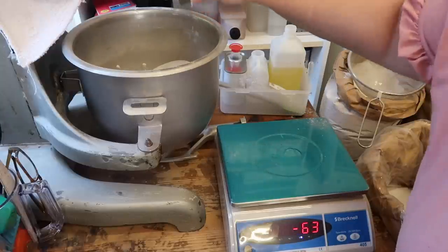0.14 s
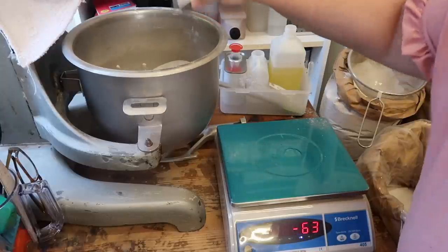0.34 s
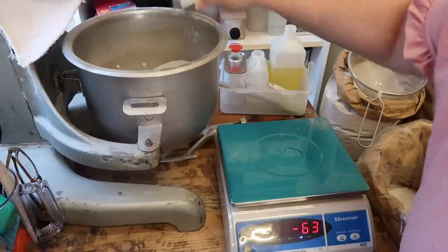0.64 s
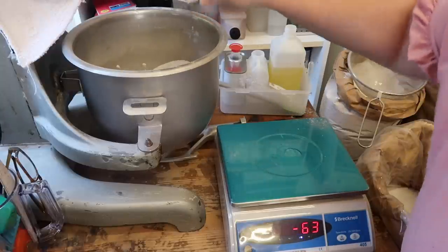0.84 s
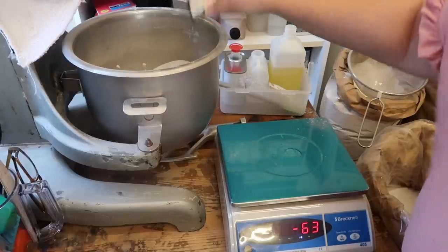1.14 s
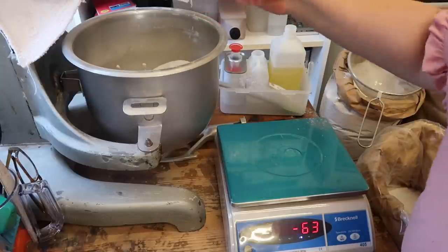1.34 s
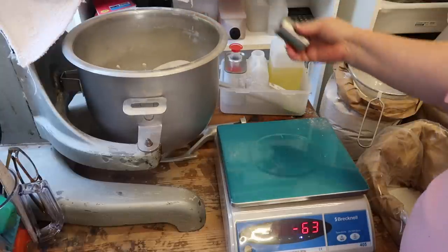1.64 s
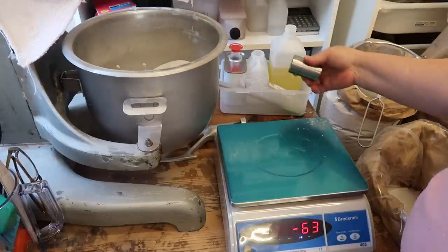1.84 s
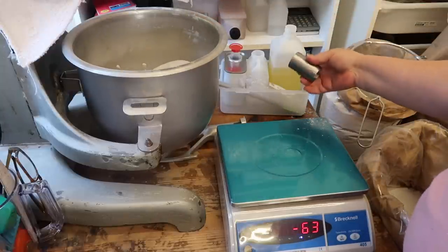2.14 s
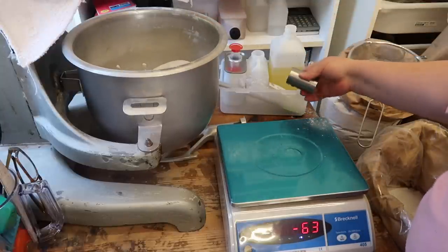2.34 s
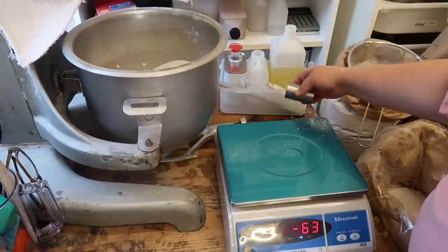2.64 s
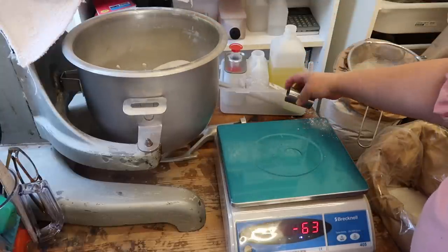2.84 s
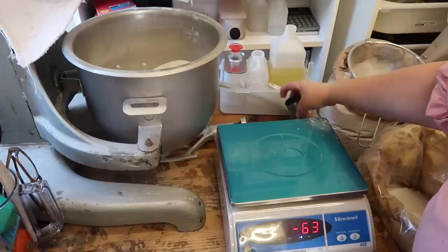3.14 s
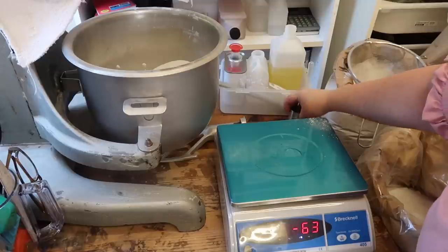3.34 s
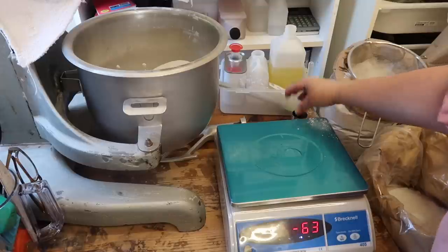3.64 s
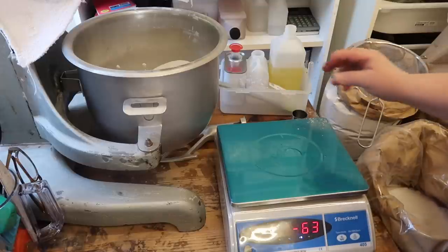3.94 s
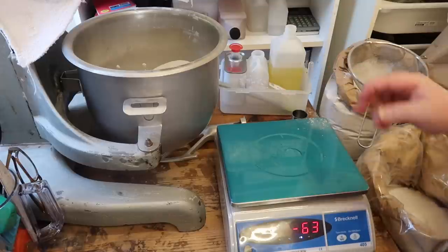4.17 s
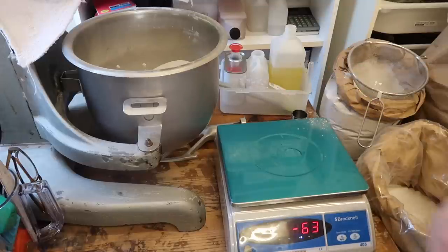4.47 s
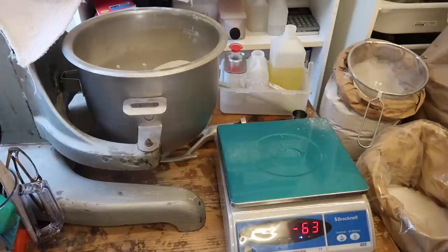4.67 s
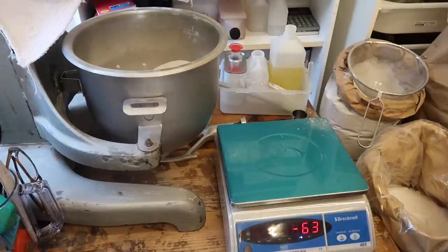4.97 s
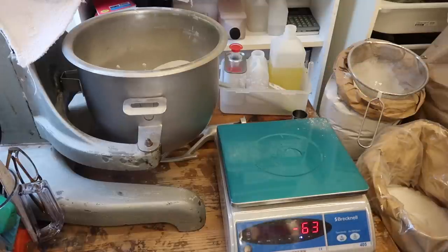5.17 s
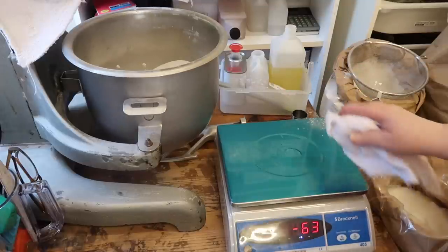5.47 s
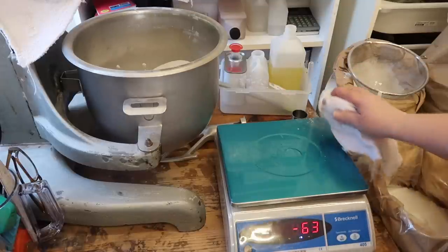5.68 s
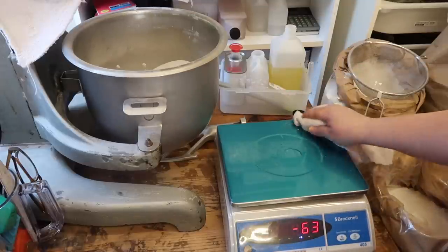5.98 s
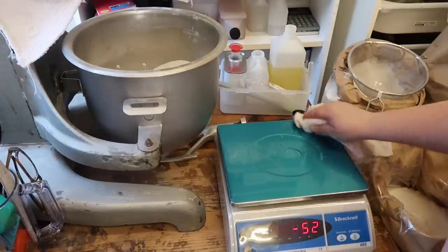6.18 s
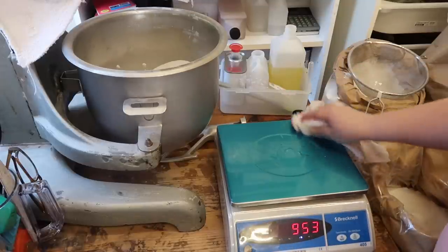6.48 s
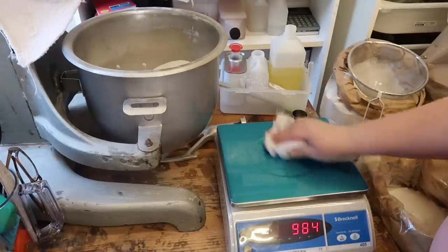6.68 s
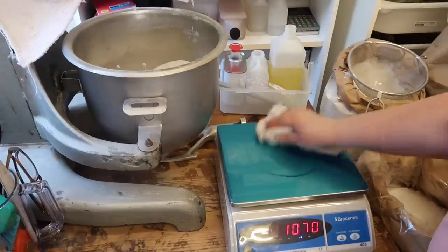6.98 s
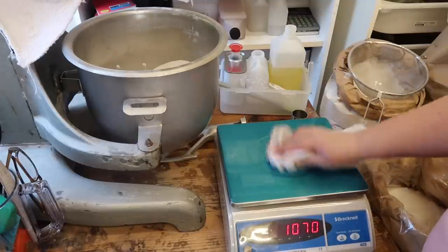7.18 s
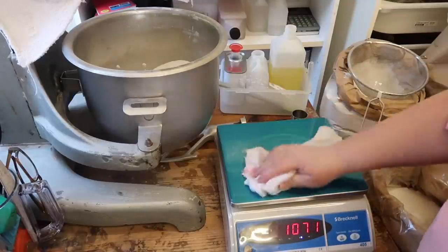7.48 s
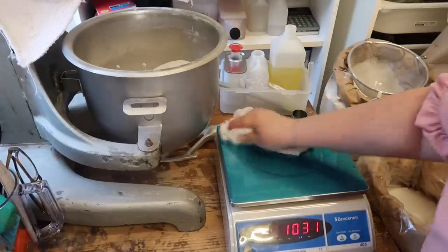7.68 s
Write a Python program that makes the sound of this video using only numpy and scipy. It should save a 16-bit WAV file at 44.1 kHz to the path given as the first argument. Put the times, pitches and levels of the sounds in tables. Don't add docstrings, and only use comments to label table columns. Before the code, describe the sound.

Low humming from a slow engine outside dominates, its octave note fading and fluttering while a deeper note lingers, then weakens. Soft air and muffled traffic fill the room. Dull fingertip scuffs lead to one prominent dry clunk of a jar on wood, rattling briefly. After a pause come faint short wiping strokes, sleeve rustle, small steel taps and a clear tink, heard close by with a short indoor echo on a stereo phone.

```python
import sys
import numpy as np
from scipy import signal
from scipy.fft import rfft, irfft
from scipy.io import wavfile
from scipy.ndimage import uniform_filter1d

SR = 44100
rng = np.random.default_rng(int(sys.argv[2]) if len(sys.argv) > 2 else 0)


def gain_from_decibels(decibels):
    exponent = np.asarray(decibels, float) / 20
    return 10 ** exponent


def transcribe(signal):
    frames = np.atleast_2d(signal).T
    limited = np.clip(frames, -1, 1)
    pcm = np.round(limited * 32767).astype(np.int16)
    wavfile.write(sys.argv[1], SR, pcm)


N = 344538
T = np.arange(N) / SR

# frequency in Hz, level in dB per Hz.
LOW_COLOUR = [(14, -2), (24, -10), (36, -1.5), (60, 0.5), (72, 2.5), (88, -3.5), (112, 0.5), (150, 1),
              (185, -3.5), (207, -8), (235, -6), (300, -7), (490, -9.5), (600, -17)]
# frequency in Hz, level in dB per Hz.
HIGH_COLOUR = [(620, 2.5), (760, 1), (1000, -2.5), (1150, 1), (1320, -2), (1450, -1.5), (2000, -4.5),
               (2300, -5.5), (2600, -8), (3800, -12), (6000, -20), (10600, -28.5), (12300, -32.5),
               (14000, -52)]
LOW_DB, HIGH_DB = -44, -51
# frequency in Hz, side minus mid in dB.
STEREO_WIDTH = [(60, -75.5), (110, -74.5), (200, -15.5), (350, -9), (640, -8.5), (1160, -8.5), (2090, -7.5),
                (3780, -4), (6830, 0), (12400, 4.5)]
ROOM_BANDS_HZ = (150, 330, 1300, 4500, 9000)
# time in seconds, level change in dB, brightening in dB.
TRAFFIC = [(0.0, 0, 1), (0.6, 1, -2), (1.1, -0.5, -2), (1.45, 0.5, -2.5), (1.9, -1, -2), (2.3, -1.5, -1),
           (2.8, 2, -2), (3.2, 0.5, -2), (3.7, 2, -1.5), (4.55, -2, 3), (4.92, 1, 1), (5.1, 1, 2.5),
           (5.6, -2.5, 3.5), (6.0, -1, 1.5), (6.35, 0.5, 0.5), (6.7, -0.5, 0.5), (7.1, -1.5, 4),
           (7.81, 2, -4)]
FOLLOW_LEVEL = (.15, .7, 1.02, .9)
FOLLOW_BRIGHT = (0.1, 0.044, 0.23, 1.01)
# middle in seconds, length in seconds, centre in Hz, width in Hz, level in dB.
ROOM_SWELLS = [(.05, 0.28, 800, 150, -55), (0.52, 0.84, 1123, 90, -57), (0.42, 0.73, 1750, 160, -58),
               (0.21, 0.18, 308, 87, -51), (2.27, 0.4, 188, 21, -46), (2.7, 0.21, 160, 65, -39.5),
               (2, 0.16, 430, 120, -61), (2.9, .4, 1440, 150, -60), (3.95, 0.26, 490, 40, -51),
               (4.5, 0.22, 790, 200, -58), (4.998, .3, 2250, 160, -60), (5.154, 0.57, 1830, 220, -59.5),
               (5.53, 1, 1480, 66, -59), (6, 0.45, 3050, 360, -64.5), (5.4, 0.17, 430, 68, -55),
               (7.135, 1, 242, 82, -48.5), (7.18, 0.97, 1180, 83, -56.5), (7.2, 0.77, 1500, 82, -59.5),
               (2.69, 0.27, 186, 30, -52), (7.33, 0.22, 270, 84, -47.5), (6.9, 0.2, 252, 49, -48)]
# frequency in Hz, level in dB per Hz.
CLOTH_COLOUR = [(1500, -9), (3000, 8.5), (6000, -0.5), (9000, -3.5), (12500, -7.5), (14000, -21)]
# middle in seconds, length in seconds, level in dB.
STROKES = [(6.09, 0.11, -64.5), (6.22, 0.078, -65.5), (6.382, .12, -57.5), (6.53, .07, -63.5),
           (6.67, .14, -61), (6.76, 0.087, -62), (6.904, 0.16, -69), (7.09, 0.17, -65.5), (7.212, .08, -71),
           (7.457, 0.15, -62.5), (7.663, .09, -64.5), (7.8, 0.11, -65.5)]
CLOTH_RESTS_S, CLOTH_REST_DB = 5.5, -74
# middle in seconds, length in seconds, level in dB.
SLEEVE = [(5.17, .12, -69), (5.45, .35, -65), (5.79, 0.18, -63.5), (6.07, .1, -69), (6.38, .15, -64),
          (6.53, .15, -69), (6.74, .2, -61), (7.08, .3, -72), (7.48, .15, -64), (7.79, .12, -67)]
SLEEVE_REST_DB = -72
# start in
# seconds, peak in dB, centre in Hz, width in octaves, length in ms.
TICKS = [(1.588, -47.5, 8000, 1.4, 1.5), (1.59, -55.5, 10000, 2.7, 16), (2.697, -39, 1200, 2, 5),
         (2.704, -35.5, 1200, 2.17, 13.7), (2.715, -41, 800, 2.4, 35), (2.697, -51, 3500, 1.6, 34),
         (2.72, -50, 2200, 1.5, 15), (3.548, -41, 1500, .2, 22), (3.478, -42, 3000, .7, 14),
         (3.331, -50, 1200, 1.1, 8.9), (5.11, -53, 5000, 0.92, 8), (5.708, -55, 8700, 0.47, 5.8),
         (6.364, -45.5, 3500, 0.8, 13)]
# start in seconds, peak in dB, centre in Hz, width in octaves, length in ms.
SIDE_TICKS = [(3.945, -57.5, 8500, 1.5, 14)]
# start in seconds, peak in dB, contact in ms, crack in dB, shudder in dB.
JAR_KNOCKS = [
    (3.4762, -8.5, 0.38, -29, -12),
    (3.517, -23, .5, -34, -4),
    (3.533, -27, .45, -34, -6),
    (3.6135, -24, .95, -20, -17),
]
# start in seconds, peak in dB, contact in ms, crack in dB, shudder in dB.
PLATE_KNOCKS = [(6.3665, -24.5, 0.24, -20, -2.5), (6.3745, -37, 0.94, -21, -8),
                (7.3685, -32.5, 0.4, -22, -17), (7.376, -40, 0.7, -18, -10),
                (7.7433, -25.5, 0.23, -27, -11.5), (7.749, -25, 0.28, -29, -17),
                (7.755, -27.5, 0.64, -23, -13), (7.772, -43, 0.32, -24, -8)]
# start in seconds, peak in dB, contact in ms, crack in dB, shudder in dB.
RIM_TINKS = [
    (6.7445, -31.5, 0.13, -8, -3),
    (7.0875, -39.5, .1, -14, -4),
]
# frequency in Hz, level in dB, time to fall 60 dB in seconds.
BENCH = [(276, -18.5, 0.26), (426, 1, 0.091), (502, -6.5, 0.21), (610, 1.5, 0.035), (672, -1, 0.074),
         (777, 3, 0.054), (932, -1, 0.044), (1026, -21, .15), (1245, -7, 0.12), (1405, -11, .12),
         (1522, -4, 0.074), (2074, -10.5, 0.053), (3280, -9, 0.043), (3750, -6, 0.038)]
# frequency in Hz, level in dB, time to fall 60 dB in seconds.
PLATE = [(399, 3.5, 0.064), (550, -2, 0.17), (631, 2, 0.1), (738, 1, 0.11), (850, -4, 0.099),
         (1005, 2.5, 0.043), (1200, -3.5, 0.062), (1550, -3, 0.049), (2206, -6, 0.034), (3860, -24, .03)]
# frequency in Hz, level in dB, time to fall 60 dB in seconds.
RIM = [(1027, -2.5, 0.083), (2065, 1, 0.115), (2760, -3, 0.029), (3240, -13, 0.025)]
# lowest Hz, highest Hz, time to fall 60 dB in seconds.
BENCH_CLUTTER = (420, 1800, .26)
PLATE_CLUTTER = (350, 1700, .25)
RIM_CLUTTER = (900, 4000, .1)
ECHO_T60_S, ECHO_DB = 0.19, -13
# time in seconds, firing rate in Hz, level of the firing note in dB.
ENGINE = [(0.0, 51.43, -45), (1.2, 51.35, -39), (2.4, 50.95, -35), (4.0, 50.35, -32), (5.0, 49.7, -31.5),
          (5.4, 49.1, -31), (6.0, 48.7, -31), (6.4, 48.65, -32), (6.8, 48.6, -34), (7.2, 48.85, -39),
          (7.6, 49.4, -41), (7.81, 49.42, -40)]
# multiple of the firing rate, loudest moment in seconds, length in seconds, level in dB.
ORDER_SWELLS = [(2.75, 1.43, 2.3, -44.5), (2.75, 4.3, 0.88, -53), (2.75, 5.56, 0.56, -50),
                (2.75, 6.6, 0.93, -50), (2.75, 7.55, 0.85, -46), (3, 1.13, 1.9, -46.5),
                (3, 2.73, 2.3, -46.5), (3, 4.16, 0.91, -51), (3.25, 0.1, 1., -52.5),
                (3.25, 2.5, 1.6, -42.5), (3.25, 4.74, 1.06, -55), (3.25, 6.83, 1.0, -48.5),
                (3.75, 1.55, 0.91, -56), (3.75, 4.42, .8, -56), (3.75, 7.0, 1.2, -55),
                (4.75, 1.3, 1.2, -58), (4.75, 5.67, 1.2, -57), (4.75, 7.0, 1.17, -52)]
# time in seconds, level in dB.
OCTAVE = [(0.0, -28), (0.46, -26.5), (1.5, -26.5), (1.93, -24.5), (2.59, -25.5), (3.31, -32.5),
          (3.78, -32.5), (4.3, -36.5), (4.83, -38.5), (5.26, -41), (5.5, -53), (6.1, -49), (6.5, -41.5),
          (6.8, -47.5), (7.07, -43), (7.33, -36), (7.81, -38)]
# middle in seconds, length in seconds, change in dB.
OCTAVE_BEATS = [(0.23, 0.14, -2), (3.893, 0.14, -9), (4.085, 0.1, -11), (4.353, 0.094, -11),
                (4.585, .2, -2.5), (4.947, 0.18, -16), (5.111, .06, -9), (5.58, .06, -8), (5.662, .06, 12),
                (5.85, 0.11, -6), (6.08, .05, 4), (6.14, .05, -10), (6.23, 0.11, 3), (6.5, .06, 2),
                (6.58, .1, -10), (6.89, .08, 13), (6.98, .07, -13), (7.27, .1, -6), (7.5, 0.13, -10)]
OCTAVE_LEAD_RAD, PATHS_PART_S, PART_RAD_PER_S = -0.9, 1.9, 1.0
WHINE_HZ, WHINE_DB = 13007, -79.5


def curves(table):
    s, *columns = np.transpose(table)
    return [np.interp(T, s, column) for column in columns]


def gain(points, hz):
    point_hz, db = np.transpose(points)
    return gain_from_decibels(np.interp(np.log(hz + 1), np.log(point_hz + 1), db))


def unit(x):
    return x / np.sqrt(np.mean(x ** 2))


def walk(rate):
    hold = int(SR / rate)
    levels = np.repeat(rng.standard_normal(N // hold + 1), hold)
    return 1.83 * uniform_filter1d(uniform_filter1d(levels, hold), hold)[:N]


def bells(s, length, size):
    return sum(g * np.exp(-8 * ((T - a) / w) ** 2) for a, w, g in zip(s, length, size))


def band(x, low_hz, high_hz, order=2):
    return signal.sosfilt(signal.butter(order, [low_hz, high_hz], "band", fs=SR, output="sos"), x)


def stereo_noise():
    hz = np.fft.rfftfreq(N, 1 / SR)
    balance = np.array([np.ones(len(hz)), gain(STEREO_WIDTH, hz)])
    return hz, rfft(rng.standard_normal((2, N))) * balance


def room_noise():
    hz, noise = stereo_noise()
    low = gain(LOW_COLOUR, hz) * (hz < 620)
    high = gain(HIGH_COLOUR, hz) * (hz >= 620)
    colour = gain_from_decibels(LOW_DB) * low / np.linalg.norm(low) + gain_from_decibels(HIGH_DB) * high / np.linalg.norm(high)
    colour = np.sqrt(N / 2) * colour
    swell_db = np.transpose([FOLLOW_LEVEL, FOLLOW_BRIGHT]) @ np.array(curves(TRAFFIC))
    out = 0
    for centre in 20 * 2 ** np.arange(0, 10, 1 / 3):
        octaves_off = np.log2((hz + 1e-3) / centre)
        window = np.cos(np.pi / 2 * np.clip(3 * octaves_off, -1, 1)) ** 2
        place = np.interp(np.log(centre), np.log(ROOM_BANDS_HZ), np.arange(5))
        share = np.clip(1 - abs(place - np.arange(4)), 0, 1)
        level_db = share @ swell_db + 0.54 * walk(4.4) + 0.99 * walk(11)
        out = out + irfft(noise * colour * window, N) * gain_from_decibels(level_db)
    return out


def room_swells():
    out = np.zeros(N)
    for s, length, centre_hz, width_hz, db in ROOM_SWELLS:
        noise = unit(band(rng.standard_normal(N), centre_hz - width_hz / 2, centre_hz + width_hz / 2))
        out += noise * gain_from_decibels(db) * np.exp(-2 * ((T - s) / length * 2) ** 2)
    return out


def cloth():
    hz, noise = stereo_noise()
    colour = gain(CLOTH_COLOUR, hz) * (hz > 800)
    s, length, db = np.transpose(STROKES)
    rest = np.clip((T - CLOTH_RESTS_S) / 0.1, 0, 1)
    press = bells(s, 1.2 * length, gain_from_decibels(db + 1)) + gain_from_decibels(CLOTH_REST_DB + 3.5) * rest
    s, length, db = np.transpose(SLEEVE)
    reach = np.clip((T - 3.6) / 1.3, 0, 1)
    swing = bells(s, 1.3 * length, gain_from_decibels(db - 2.5)) + gain_from_decibels(SLEEVE_REST_DB + 1.0) * reach
    stroke, rustle = (unit(irfft(n * colour, N)) for n in noise)
    grain = gain_from_decibels(1.3 * walk(150))
    return np.array([stroke * press, rustle * swing]) * grain


def ticks(events, side_share):
    t = T[:SR // 4]
    hz = np.fft.rfftfreq(len(t), 1 / SR) + 1
    out = np.zeros((2, N + len(t)))
    for s, db, centre_hz, octaves, length_ms in events:
        colour = np.exp(-2 * (np.log2(hz / centre_hz) / octaves) ** 2)
        mid, side = irfft(rfft(rng.standard_normal((2, len(t)))) * colour, len(t))
        side = side * side_share * (centre_hz / 8000) ** 0.4
        attack = np.clip(t * 10000 / length_ms, 0, 1)
        shape = np.exp(-t * 1000 / length_ms) * attack
        burst = np.array([mid + side, mid - side]) / np.std(mid)
        start = int(s * SR)
        out[:, start:start + len(t)] += burst * gain_from_decibels(db) * shape
    return out[:, :N]


def knocks(events, body, clutter, pan_db):
    t = T[:SR // 3]
    low_hz, high_hz, clutter_t60 = clutter
    ring = 0
    for k, (hz, db, t60) in enumerate(body):
        ring = ring + (-1) ** k * gain_from_decibels(db) * np.sin(2 * np.pi * hz * t) * 1000 ** (-t / t60)
    out = np.zeros((2, N + len(t)))
    for s, db, contact_ms, crack_db, shudder_db in events:
        noise = rng.standard_normal((2, len(t)))
        contact = contact_ms / 1000
        push = np.sin(np.pi * np.clip((t + 1 / SR) / (contact + 2 / SR), 0, 1)) ** 2
        hit = signal.fftconvolve(push, ring)[:len(t)]
        crack = unit(band(noise[0], 2000, 7900)) * np.exp(-t / 0.0076)
        fade = 1000 ** (-t / clutter_t60) * np.clip(t / 0.0019, 0, 1)
        shudder = unit(band(noise[1], low_hz, high_hz, order=4)) * fade
        hit = hit / abs(hit).max() + (gain_from_decibels(crack_db) * crack + gain_from_decibels(shudder_db) * shudder) / 3
        start = int(s * SR)
        out[:, start:start + len(t)] += hit * gain_from_decibels(db + np.array([[pan_db], [-pan_db]]) / 2)
    return out[:, :N]


def echoes(x):
    t = T[:SR // 2]
    mid, side = rng.standard_normal((2, len(t))) * [[1], [0.3]]
    fade = 1000 ** (-t / ECHO_T60_S) * np.clip(t / 0.01, 0, 1)
    tail = band(np.array([mid + side, mid - side]) * fade, 600, 2300, order=4)
    tail = tail / np.linalg.norm(rfft(tail[0])) * np.sqrt(len(t) / 20)
    return gain_from_decibels(ECHO_DB) * signal.fftconvolve(x[None], tail)[:, :N]


def drone():
    firing_hz, firing_db = curves(ENGINE)
    turn = 2 * np.pi * np.cumsum(firing_hz) / SR
    out = np.sin(turn) * gain_from_decibels(firing_db - 0.1 + 0.34 * walk(6))
    multiple, s, length, db = np.transpose(ORDER_SWELLS)
    for k in (2.75, 3, 3.25, 3.75, 4.75):
        mine = abs(multiple - k) < 0.12
        tone = np.sin(k * turn + 0.65 * walk(6))
        out += tone * bells(s[mine], 1.47 * length[mine], gain_from_decibels(db[mine])) * gain_from_decibels(2 * walk(9.1))
    lead = OCTAVE_LEAD_RAD + PART_RAD_PER_S * np.maximum(T - PATHS_PART_S, 0) + 0.12 * walk(5)
    octave_db = curves(OCTAVE)[0] + bells(*np.transpose(OCTAVE_BEATS)) - 0.93 + 0.49 * walk(16)
    out += np.sin(2 * turn + lead) * gain_from_decibels(octave_db)
    return np.sqrt(2) * out


def scene():
    mid, side = room_noise() + cloth()
    air = np.array([mid + side, mid - side])
    things = ticks(TICKS, side_share=0.48) + ticks(SIDE_TICKS, side_share=1.2)
    things += knocks(JAR_KNOCKS, BENCH, BENCH_CLUTTER, pan_db=0.9)
    things += knocks(PLATE_KNOCKS, PLATE, PLATE_CLUTTER, pan_db=0.3)
    things += knocks(RIM_TINKS, RIM, RIM_CLUTTER, pan_db=0.1)
    return air + room_swells() + things + echoes(things.mean(axis=0)) + drone()


def low_pass(x):
    return signal.sosfilt(signal.butter(12, 15200, fs=SR, output="sos"), x)


def record(dry):
    whine = np.sqrt(2) * gain_from_decibels(WHINE_DB) * np.sin(2 * np.pi * WHINE_HZ * T)
    mix = dry + np.array([whine, -whine])
    return low_pass(mix)


dry = scene()
out = record(dry)
transcribe(out)
```